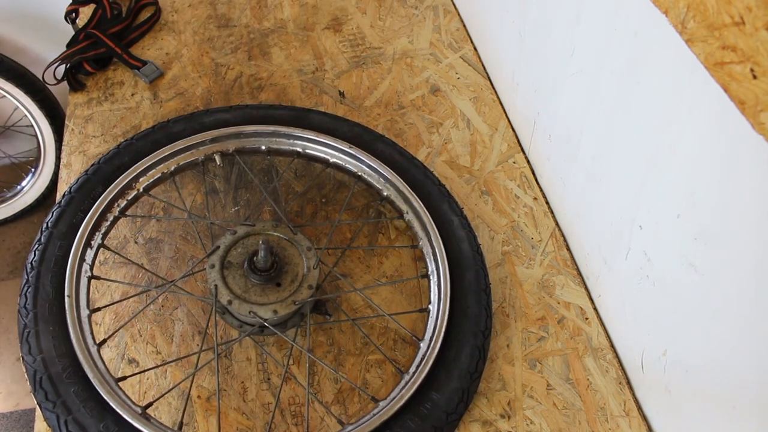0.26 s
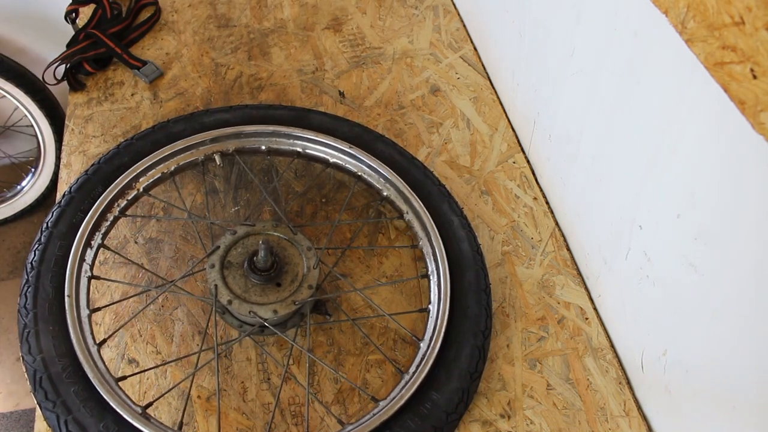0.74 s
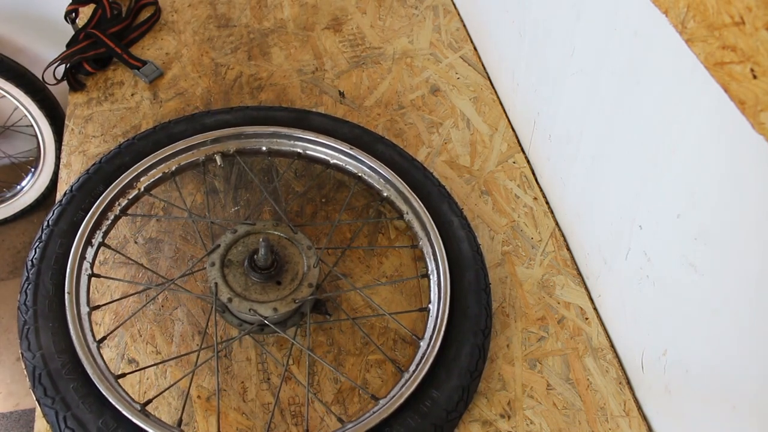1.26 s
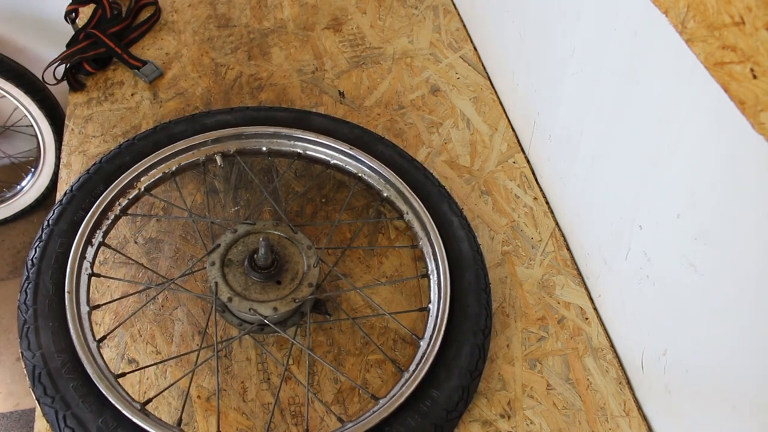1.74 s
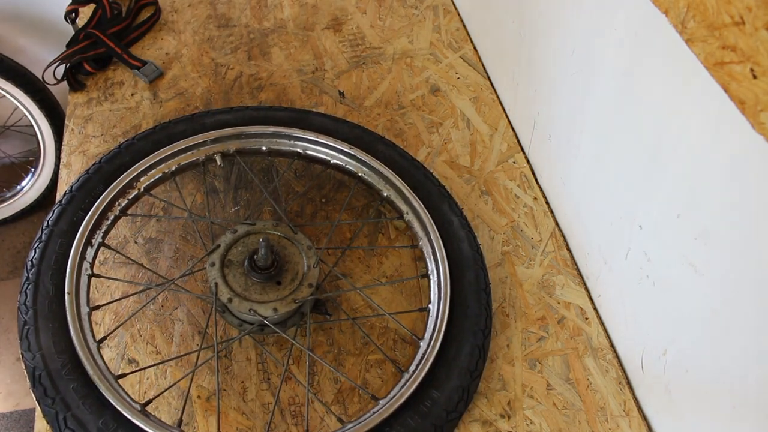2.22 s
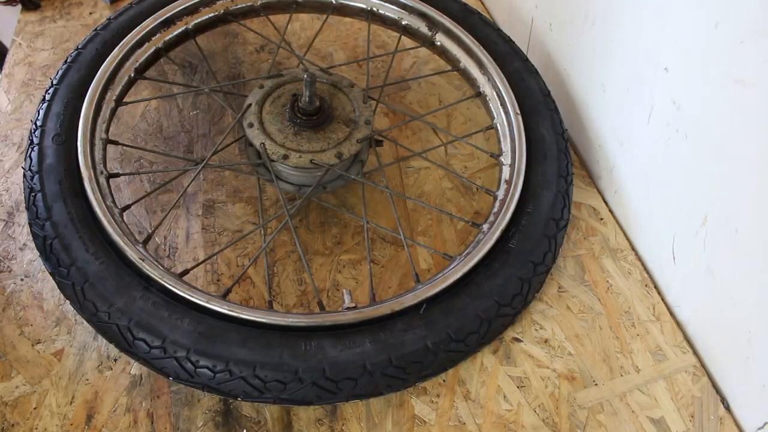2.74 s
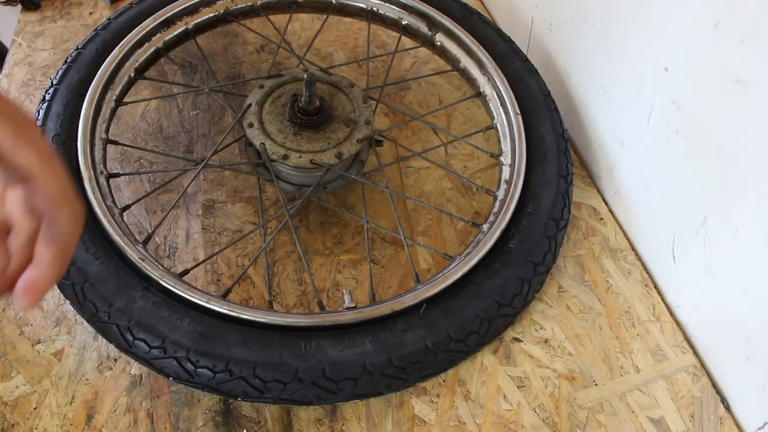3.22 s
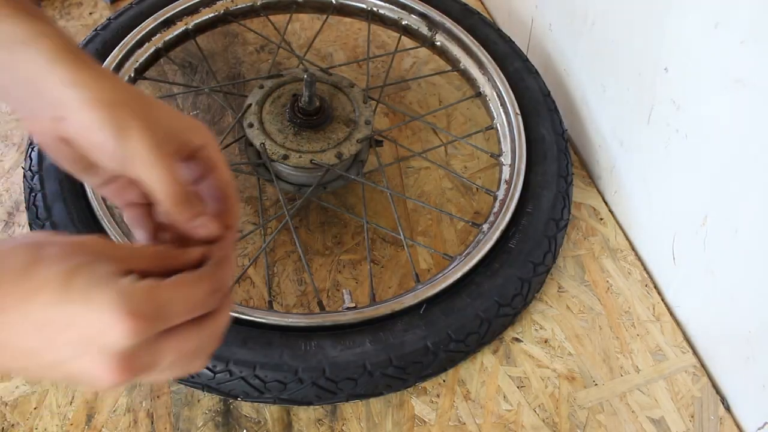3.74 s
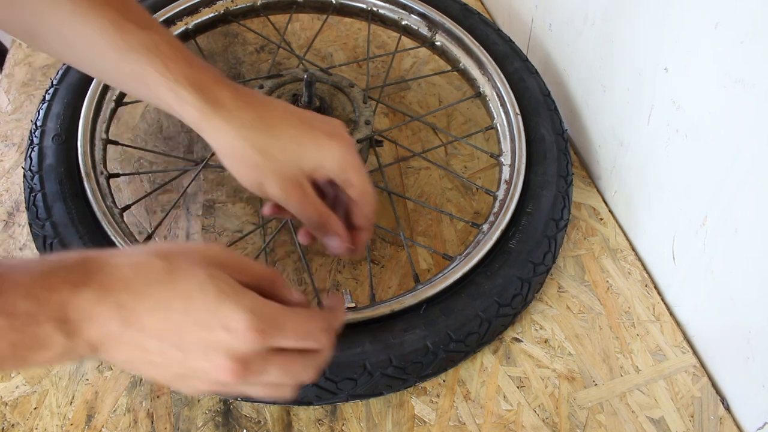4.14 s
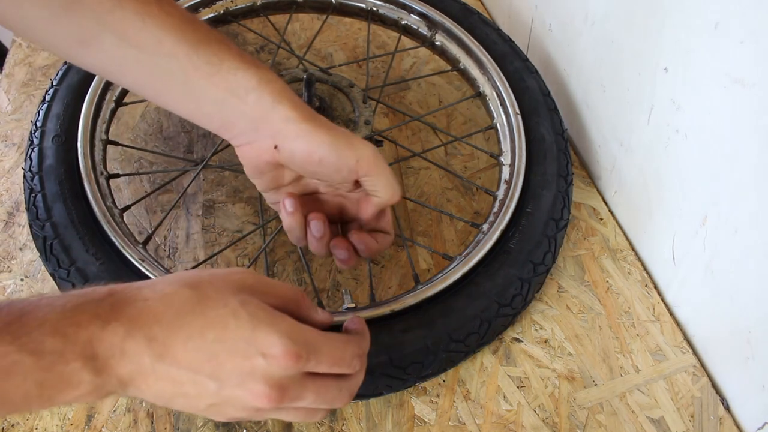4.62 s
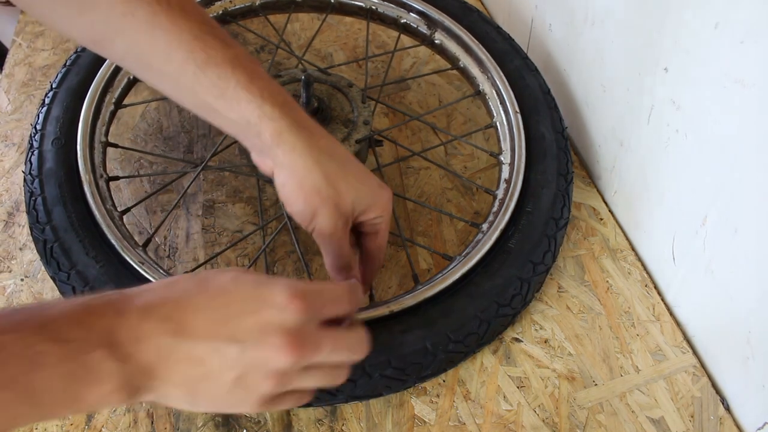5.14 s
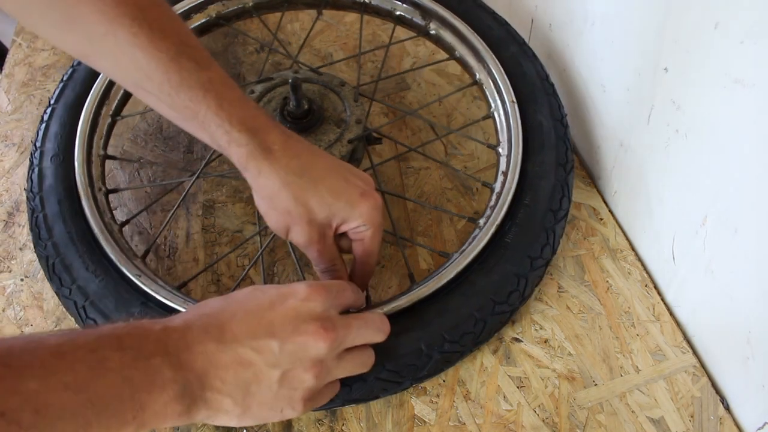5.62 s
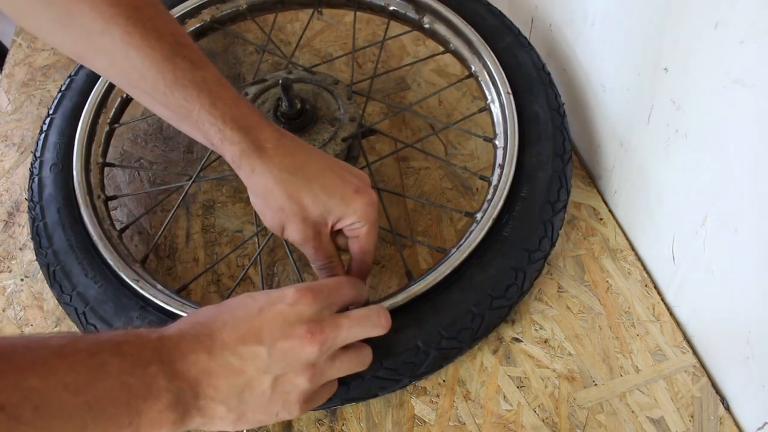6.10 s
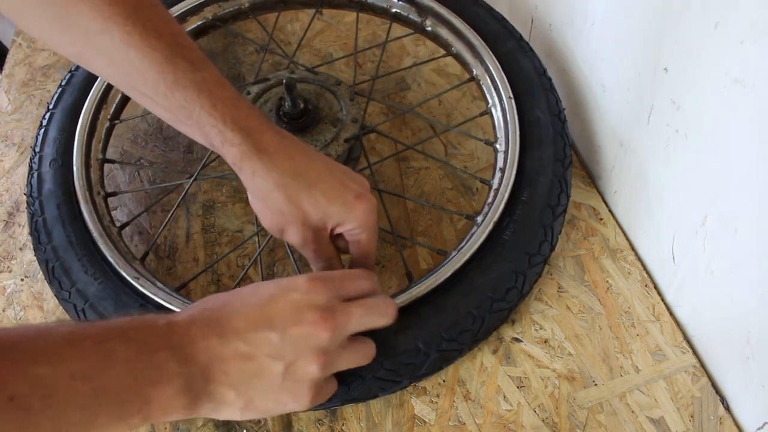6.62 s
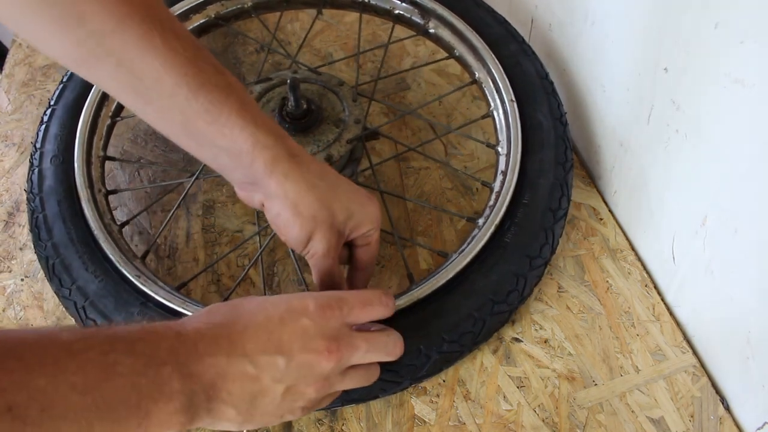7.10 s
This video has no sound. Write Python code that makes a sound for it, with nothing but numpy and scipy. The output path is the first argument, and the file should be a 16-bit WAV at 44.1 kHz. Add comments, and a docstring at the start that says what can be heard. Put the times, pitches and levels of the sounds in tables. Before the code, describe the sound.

Metal levers clatter and ring in a small workshop, then tools knock on chipboard and fingers softly tap a wheel's rim and tyre.

```python
"""In a small workshop, a knock and a snap: a steel tyre lever clashes on the hub of a spoked wheel.
Loose levers slide, fall and jangle on the chipboard bench until one lies free and rings on.
At 2 s the wheel bumps on its tyre; then tools knock on the board, with a few dry snaps.
From 4.4 s fingers work at the rim with soft taps, thuds and ticks, and a spoke pings.
A short, bright room answers the blows; a faint hiss runs throughout."""
import sys
import numpy as np
from scipy import signal
from scipy.fft import rfft, irfft
from scipy.io import wavfile

SR = 44100
rng = np.random.default_rng(int(sys.argv[2]) if len(sys.argv) > 2 else 0)


def master_out(mix):
    """Clip the mix to full scale and print it as 16-bit PCM to the path in sys.argv[1]."""
    frames = np.transpose(np.atleast_2d(mix))
    ceiling = np.clip(frames, -1, 1)
    pcm = np.round(ceiling * 32767).astype(np.int16)
    wavfile.write(sys.argv[1], SR, pcm)


N = 324576
OPPOSED = np.array([[1], [-1]])  # left, right sign


def undb(db):
    """Decibels to gain."""
    return 10 ** (np.asarray(db) / 20)


def clock(length_s):
    """Sample times from zero."""
    return np.arange(int(length_s * SR)) / SR


def fade(t, t60_s):
    """Exponential decay, 60 dB down at t60_s."""
    return np.exp(-np.log(1000) * t / max(t60_s, 1e-3))


def onset(sound, rise_s):
    """Exponential attack on a sound."""
    t = np.arange(sound.shape[-1]) / SR
    return sound * (1 - np.exp(-t / rise_s))


def add(track, start_s, sound):
    """Mix a sound into a track."""
    i = max(int(start_s * SR), 0)
    track[..., i:i + sound.shape[-1]] += sound[..., :N - i]


def gains(hz, spectrum):
    """Gain of a spectrum, interpolated over log frequency."""
    points_hz, db = np.transpose(spectrum)
    return undb(np.interp(np.log(hz + 1), np.log(points_hz), db))


def noise(size, spectrum, bass_db=0, treble_db=0, bass_hz=450, treble_hz=2800):
    """Unit noise of a given spectrum, then bass and treble shelves."""
    hz = np.arange(size // 2 + 1) * SR / size
    shape = gains(hz, spectrum)
    shelves = undb(bass_db / (1 + (hz / bass_hz) ** 2) + treble_db * hz ** 2 / (hz ** 2 + treble_hz ** 2))
    phases = np.exp(2j * np.pi * rng.random(len(hz)))
    return irfft(phases * shape * shelves, size) * np.sqrt(size / np.mean(shape ** 2))


# stereo width of the room: f/Hz, side minus mid/dB
WIDTH = [(80, -15), (200, -17), (500, -13), (1000, -8.5), (2200, -5.5), (4300, -3.5), (8000, 0),
         (12500, 3.5)]


def diffuse(spectrum, size, bass_db=0, treble_db=0):
    """Noise from all sides: alike at both ears in the bass, unrelated in the treble."""
    mid, side = (noise(size, spectrum, bass_db, treble_db) for _ in range(2))
    width = gains(np.arange(size // 2 + 1) * SR / size, WIDTH)
    return irfft((rfft(mid) + OPPOSED * rfft(side) * width) / np.sqrt(1 + width ** 2), size)


def absorb(field, low_t60_s=.32, treble_t60_s=.27, split_hz=3500):
    """Walls soak up a sound field, treble first."""
    t = np.arange(field.shape[1]) / SR
    low = signal.sosfilt(signal.butter(1, split_hz, fs=SR, output="sos"), field)
    return low * fade(t, low_t60_s) + (field - low) * fade(t, treble_t60_s)


def room(x, direct_db, wet_db):
    """Direct sound plus dense reflections that build and decay."""
    white = diffuse([(1, 0), (SR, 0)], SR // 2)
    tail = onset(absorb(white), rise_s=.004)
    tail /= np.sqrt(np.sum(tail ** 2) / 2)
    reflections = signal.fftconvolve(np.atleast_2d(x), tail, axes=1)[:, :N]
    return undb(direct_db) * x + undb(wet_db) * reflections


def blow(body, t60_s, bass_db=0, treble_db=0, rise_s=.0001):
    """A contact excites a body's dense, quickly damped modes."""
    t = clock(.25)
    return onset(noise(len(t), body, bass_db, treble_db) * fade(t, t60_s), rise_s)


def ring(modes, damp_s=np.inf, detune=0):
    """Struck metal: the strike point weights the modes; contact detunes and damps them."""
    t, out = clock(min(1.5, damp_s)), 0
    for hz, db, t60_s in modes:
        phase, weight_db = 2 * np.pi * rng.random(), 2 * rng.standard_normal()
        hz = hz * (1 + detune * rng.standard_normal())
        ear_lag = np.arctan(gains(hz, WIDTH)) * rng.choice([-1, 1]) * OPPOSED  # wider for high modes
        wave = np.sin(2 * np.pi * hz * t + phase + ear_lag)
        out = out + undb(db + weight_db) * wave * fade(t, t60_s)
    power = sum(undb(db) ** 2 for _, db, _ in modes) / 2
    return out * fade(t, damp_s) / np.sqrt(power)


def strikes(contacts, body, modes, clack_t60_s, rise_s, damp_s):
    """Mono clacks and stereo rings; the faces graze before they bite, so both build over rise_s."""
    clacks, rings = np.zeros(N), np.zeros((2, N))
    for start_s, db, bass_db, treble_db, ring_db in contacts:
        add(clacks, start_s, undb(db) * blow(body, clack_t60_s, bass_db, treble_db, rise_s))
        add(rings, start_s, undb(ring_db) * onset(ring(modes, damp_s, detune=.0017), rise_s))
    return clacks, rings


def bounces(blows, count, clack_loss_db, bass_loss_db, ring_loss_db, scatter_db=3.5):
    """Each blow rebounds, quicker and lighter; losses are per doubling of the contact number."""
    k, contacts = np.arange(count), []
    gap_ratio, gap_jitter = .92, .12
    for start_s, db, bass_db, treble_db, ring_db, gap_s in blows:
        timing, force = rng.standard_normal((count, 2)).T
        gaps_s = gap_s * gap_ratio ** k * (1 + gap_jitter * timing)
        times_s = start_s + np.cumsum(gaps_s) - gaps_s
        forces_db = scatter_db * force * (k > 0)
        for at_s, doublings, force_db in zip(times_s, np.log2(1 + k), forces_db):
            contacts.append((at_s, db - clack_loss_db * doublings + force_db,
                             bass_db - bass_loss_db * doublings, treble_db,
                             ring_db - ring_loss_db * doublings + force_db))
    return contacts


# hiss spectra, common to both ears and opposed: f/Hz, level/dB
HISS_MID = [(15, -58), (25, -26), (79, -2), (274, -14), (648, -14.5), (804, -15.5), (1020, -15.5),
            (15500, -26.5)]
HISS_SIDE = [(15, -52.5), (25, -18), (160, -2.5), (523, -5), (582, -7.5), (762, -6), (15500, -21.5)]


def hiss(mid_db=-57.5, side_db=-55.5):
    """Faint, wide, steady hiss with a dulled top."""
    mid, side = (noise(N, shape, treble_db=-9.5, treble_hz=15000) for shape in (HISS_MID, HISS_SIDE))
    return undb(mid_db) * mid + undb(side_db) * side * OPPOSED


# hard knocks on the board: t/s, level/dB, bass/dB, treble/dB
BOARD_KNOCKS = [(.011, -2, -14, -13), (2.233, -24.5, -5, .5), (2.356, -17.5, 3, 7.5), (3.035, -10, -4, -6),
                (3.122, -22, -3, 3), (3.275, -10.5, -0.5, 3), (3.537, -26.5, 7, -25),
                (3.561, -20.5, 3, -7.5), (3.603, -21, 6.5, -3.5), (3.728, -15.5, 2.5, -4)]
# chipboard spectrum: f/Hz, level/dB
BOARD_SPECTRUM = [(30, -27), (100, -6.5), (160, 1), (280, 0.5), (450, -3), (800, -1.5), (1700, -4),
                  (3500, -5.5), (6000, -15), (10000, -24.5), (15500, -41.5)]


def board(wall_db=-5, board_t60_s=.082, bump_db=-1, bump_bass_db=7.5, bump_treble_db=-14.5):
    """Knocks and dull wheel bumps, heard via the walls: the room fills while the board rings."""
    out, t = np.zeros((2, N)), clock(.5)
    fill = np.sqrt(1 - fade(t, board_t60_s))
    bumps = [(start_s, db + bump_db, bump_bass_db, bump_treble_db) for start_s, db, _ in WHEEL_BUMPS]
    for start_s, db, bass_db, treble_db in BOARD_KNOCKS + bumps:
        field = absorb(diffuse(BOARD_SPECTRUM, len(t), bass_db, treble_db))
        add(out, start_s, undb(db + wall_db) * field * fill)
    return out


# dry snaps: t/s, level/dB, share unlike between the ears/0-1
SNAPS = [(0.011, -10, 0.5), (0.0145, -6.5, 0.57), (2.4847, -27.5, 0.93), (2.499, -45, .8),
         (2.510, -39, 0.7), (2.6606, -28.5, 0.92), (2.666, -26, 0.57), (4.035, -43.5, 0.7)]
# snap spectrum: f/Hz, level/dB
SNAP_SPECTRUM = [(80, -51), (500, -15.5), (1000, -1.5), (1500, -4), (2200, -5), (4200, -14.5),
                 (6500, -28.5), (15000, -36)]


def snaps(t60_s=.015):
    """Dry, hard snaps: a sharp tick plus a duller one, partly unlike in the two ears."""
    out = np.zeros((2, N))
    for start_s, db, apart in SNAPS:
        both, left, right = (blow(SNAP_SPECTRUM, t60_s)
                             + undb(6) * blow(SNAP_SPECTRUM, t60_s, bass_db=-5, treble_db=-12)
                             for _ in range(3))
        snap = np.sqrt(1 - apart) * both + np.sqrt(apart) * np.array([left, right])
        add(out, start_s, undb(db) * snap)
    return out


# lever on hub: t/s, clack/dB, bass/dB, treble/dB, ring/dB
HUB_CLASHES = [(.018, -15.5, 1, 17.5, -23), (.231, -25, 7.5, 14.5, -16), (.240, -10.5, 0, 7, -9),
               (.249, -9.5, -13, 13, -33), (.314, -12.5, 4, 6, -31.5), (.364, -14, 3, 16, -15)]
# modes of the clash: f/Hz, level/dB, t60/s
HUB_MODES = [(3284, -7, .15), (3699, -4, .35), (4059, -9, .4), (4544, 0, .3), (4727, -11, .5),
             (5281, -7, .3), (5900, -7, .2), (6142, -3, .22), (6385, -8, .35), (6751, -9, .2),
             (7380, -10, .3), (7892, -11, .35), (8974, -14, .35), (10330, -11, .3)]
# lever clack spectrum: f/Hz, level/dB
CLACK_SPECTRUM = [(25, 3), (60, -1.5), (230, 1), (450, -4.5), (750, -2), (1300, -5.5), (2500, -7),
                  (4000, -0.5), (6300, 0.5), (8000, -9.5), (11000, -17.5), (15500, -41)]


def hub():
    """A gripped lever clashes on the hub and rings briefly."""
    clacks, rings = strikes(HUB_CLASHES, CLACK_SPECTRUM, HUB_MODES,
                            clack_t60_s=.02, rise_s=.002, damp_s=.21)
    return room(clacks, direct_db=-2.5, wet_db=2.5) + room(rings, direct_db=-4.5, wet_db=-6)


# slides on the board, finger rubs: t/s, length/s, level/dB, bass/dB, treble/dB
SLIDES = [(0.03, 0.16, -26, 0, -9), (0.70, 0.29, -31.5, -10, -20), (1.354, 0.23, -52.5, 7, -2),
          (1.55, 0.12, -35.5, -14, -23), (2.58, 0.08, -36.5, -57, -20), (5.464, 0.087, -67.5, -3, 9),
          (6.762, 0.18, -64.5, -8, 6)]
# friction spectrum: f/Hz, level/dB
SCRAPE_SPECTRUM = [(50, -27), (200, -4), (400, -15), (650, -2.5), (1100, -6.5), (1900, -7.5), (3200, -9.5),
                   (5500, -7.5), (7400, -13), (8200, -18.5), (9400, -12), (15500, -44)]


def scrapes(grain_db=4, catches_per_s=400):
    """Sliding contact catches and slips on the wood chips, in a short swell."""
    out = np.zeros(N)
    for start_s, length_s, db, bass_db, treble_db in SLIDES:
        t = clock(length_s)
        catch = np.interp(t * catches_per_s, np.arange(SR), rng.standard_normal(SR))
        rub = noise(SR, SCRAPE_SPECTRUM, bass_db, treble_db)[:len(t)] * undb(grain_db * catch)
        add(out, start_s, undb(db) * rub * np.sin(np.pi * t / length_s))
    return room(out, direct_db=-1.5, wet_db=2)


# a lever falls on the others: t/s, clack/dB, bass/dB, treble/dB, ring/dB, first bounce gap/s
LEVER_FALLS = [(.368, -24.5, 7, 16, -16, .012), (.428, -7.5, 4, -4, -11.5, .026),
               (.556, -28, 6.5, -6, -17.5, .008), (.569, -11.5, 8.5, 0, -13.5, 0.027),
               (.864, -15, -1, -14, -28, .009), (.888, -8, 3, -1, -11, .02),
               (.963, -28.5, -8, 18, -15, .014), (1.021, -16, 5, -8.5, -16.5, 0.032)]
# modes of the piled levers and of the one lying almost free: f/Hz, level/dB, t60/s
PILE_MODES = [(957, -13, .5), (1570, -12, .35), (1815, -11, .4), (2310, -11, .4), (2990, -7, .4),
              (3105, -9, .35), (4057, -.5, .4), (4115, 1, .4), (5070, -5, .4), (5120, -5, .4),
              (5178, -3, .4), (5205, -4, .4), (5297, -9, .3), (6159, -4, .4), (6320, -4, .35),
              (6447, -4, .35), (7355, -4, .35), (7520, -5, .35), (8652, -4, .4), (8857, -6, .4),
              (9112, -12, .35), (10067, -8, .4), (10322, -9, .35), (10780, -10, .3), (11810, -12, .35),
              (12520, -18, .35), (13410, -22, .35), (13826, -21, .4), (14830, -26, .35), (15082, -26, .4)]
FREE_MODES = [(3132, -14, 1.1), (3142, -2, 1.25), (3604, -26, .8), (4724, -19, 1.0), (7202, -18, .75),
              (8885, -24, .8), (11590, -18, .8)]


def levers(last_bounce_s=1.165, last_bounce_db=-34.5):
    """Loose levers jangle and damp each other until one lies free and rings on."""
    jangle = bounces(LEVER_FALLS, count=6, clack_loss_db=3.5, bass_loss_db=2, ring_loss_db=6)
    clacks, rings = strikes(jangle, CLACK_SPECTRUM, PILE_MODES + FREE_MODES,
                            clack_t60_s=.044, rise_s=.0031, damp_s=.32)
    out = room(clacks, direct_db=-2, wet_db=1.5) + room(rings, direct_db=-1.5, wet_db=-3.5)
    add(out, last_bounce_s, undb(last_bounce_db) * onset(ring(FREE_MODES), rise_s=.014))
    return out


# the shifted wheel bumps on its tyre; fingers press the tyre: t/s, level/dB, f/Hz
WHEEL_BUMPS = [(2.021, -30, 225), (2.064, -25.5, 228), (2.095, -31.5, 221), (2.151, -21.5, 200),
               (2.178, -29, 217)]
TYRE_PRESSES = [(3.235, -43, 165), (5.075, -31, 122), (5.327, -44, 146), (5.977, -33.5, 105),
                (6.195, -41.5, 113), (6.411, -46, 98), (6.447, -33, 103), (6.627, -41.5, 133),
                (6.725, -41, 115), (6.964, -46.5, 146)]
# flexing rubber spectrum: f/Hz, level/dB
RUBBER_SPECTRUM = [(35, -23), (130, 1), (300, -7), (700, -34), (4000, -85)]


def tyre(nudges, flex_db=-8, peak_s=.0079, shake_db=-8.5, shake_hz=128):
    """Soft rubber pushes slowly, so each thud swells, then dies; rim taps shake the tyre too."""
    out, t = np.zeros(N), clock(.25)
    swell = t / peak_s * np.exp(1 - t / peak_s)
    shakes = [(start_s, db + shake_db, shake_hz) for start_s, db, _, _ in RIM_TAPS]
    for start_s, db, hz in WHEEL_BUMPS + TYRE_PRESSES + shakes + nudges:
        thud = np.sin(2 * np.pi * hz * t) + undb(flex_db) * noise(len(t), RUBBER_SPECTRUM)
        add(out, start_s, undb(db) * thud * swell)
    return room(out, direct_db=.5, wet_db=-5)


# fingers and a small part tap the rim: t/s, level/dB, treble/dB, ring/dB
RIM_TAPS = [(4.412, -55.5, 3, -47.5), (5.823, -35, -12, -60), (6.054, -37, -5, -63), (6.073, -35, -5, -51),
            (6.259, -30.5, 5.5, -61), (6.540, -30.5, -10, -30.5), (6.806, -43, -9, -64)]
# rim modes: f/Hz, level/dB, t60/s
RIM_MODES = [(307, -7, .4), (517, -8, .4), (1798, 0, .22), (2110, -4, .3), (2837, -4, .3), (3058, -6, .2),
             (3450, -11, .25), (4204, -11, .2), (4899, -13, .22), (6336, -14, .22), (7203, -14, .2)]
# tap spectrum: f/Hz, level/dB
TAP_SPECTRUM = [(50, -9), (130, -19), (400, 2), (600, 0.5), (900, -10.5), (1600, -5.5), (3000, -7),
                (6000, -9.5), (10000, -16), (15500, -31)]


def rim(nudges, tap_bass_db=7, rebound_s=.014, brush_db=-57, brush_db_per_db=.38):
    """Light, close taps, one rebound each; nudges and presses brush the rim with a faint tick."""
    blows = [(start_s, db, tap_bass_db, treble_db, ring_db, rebound_s)
             for start_s, db, treble_db, ring_db in RIM_TAPS]
    contacts = bounces(blows, count=2, clack_loss_db=10, bass_loss_db=-10, ring_loss_db=7.5)
    taps, rings = strikes(contacts, TAP_SPECTRUM, RIM_MODES, clack_t60_s=.047, rise_s=.0013, damp_s=.19)
    for start_s, db, _ in nudges + TYRE_PRESSES:
        tick_db = brush_db + brush_db_per_db * (db - NUDGE_DB)
        add(taps, start_s, undb(tick_db) * blow(TAP_SPECTRUM, t60_s=.2, treble_db=-6, rise_s=.0087))
    return room(taps, direct_db=1.5, wet_db=-1.5) + room(rings, direct_db=-3, wet_db=-9)


# spoke modes: f/Hz, level/dB, t60/s
SPOKE_MODES = [(786, 0, .75), (2083, -11, .44), (2293, -9, .48), (3031, -11, .4), (4183, -9, .3)]


def spoke(start_s=5.081, db=-52.5):
    """A brushed spoke pings."""
    out = np.zeros((2, N))
    add(out, start_s, undb(db) * ring(SPOKE_MODES))
    return out


NUDGE_DB, NUDGE_HZ = -54, 163.4


def fumbles(count=20, span_s=(5.3, 7.3), spread_db=1.5, spread_octaves=.64):
    """Working fingers nudge the wheel at loose intervals; rows of t/s, level/dB, f/Hz."""
    times_s = np.interp(np.arange(count) + rng.random(count), [0, count], span_s)
    return [(at_s, NUDGE_DB - spread_db * softness, NUDGE_HZ * 2 ** (spread_octaves * place))
            for at_s, (softness, place) in zip(times_s, rng.standard_normal((count, 2)))]


def scene():
    """All sources over the steady hiss."""
    nudges = fumbles()
    metal = hub() + levers() + rim(nudges) + spoke()
    return metal + board() + tyre(nudges) + snaps() + scrapes() + hiss()


def record(dry, top_hz=15800):
    """Clip at full scale, then a steep low-pass."""
    return signal.sosfilt(signal.ellip(10, .2, 70, top_hz, fs=SR, output="sos"), np.clip(dry, -1, 1))


dry = scene()
out = record(dry)
master_out(out)
```